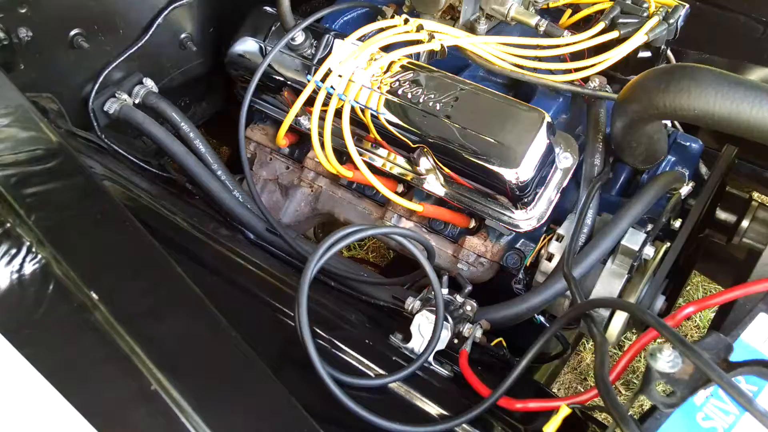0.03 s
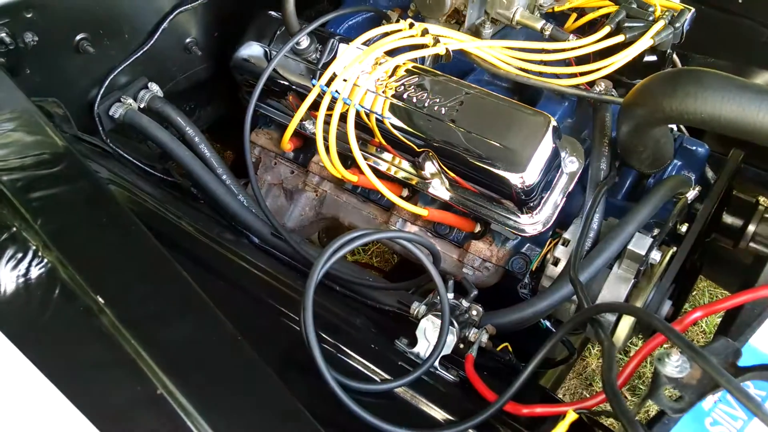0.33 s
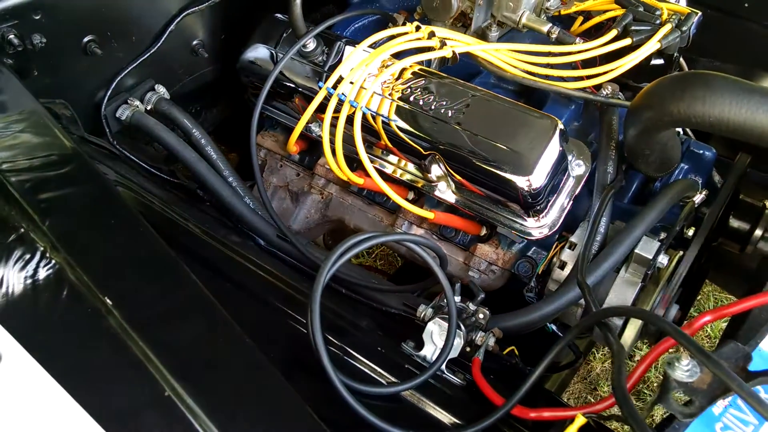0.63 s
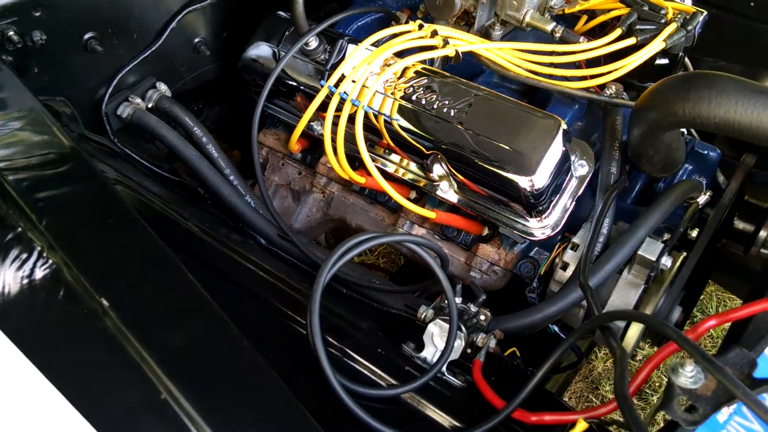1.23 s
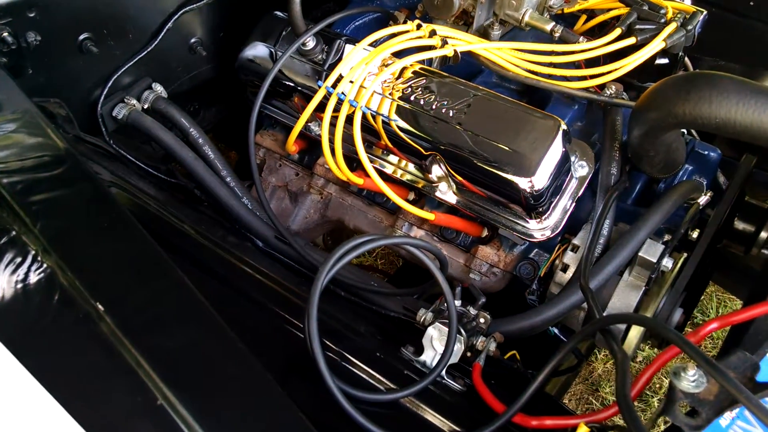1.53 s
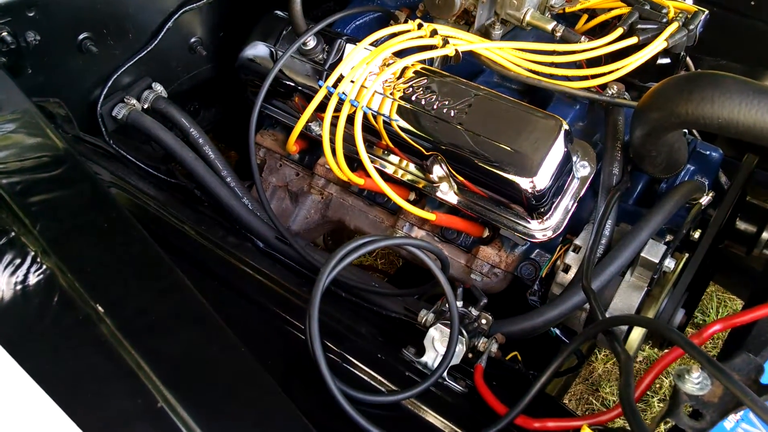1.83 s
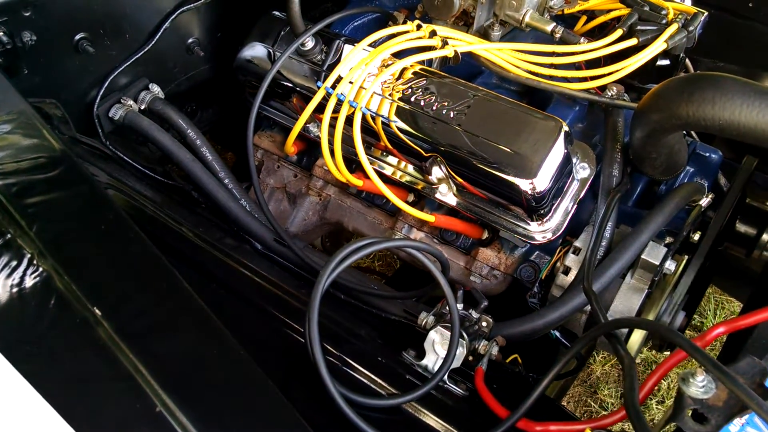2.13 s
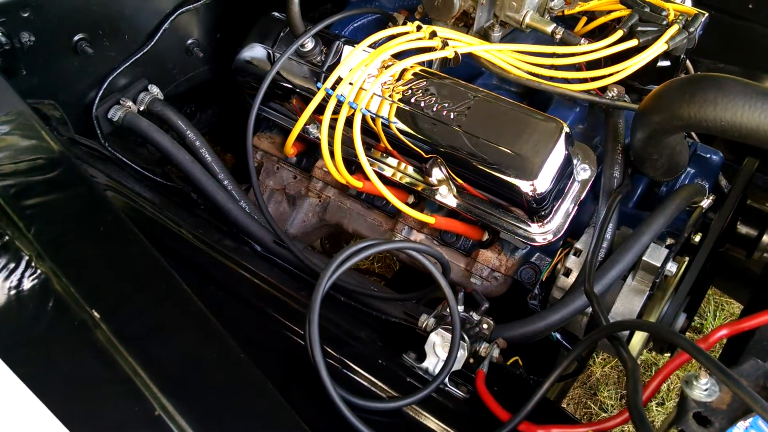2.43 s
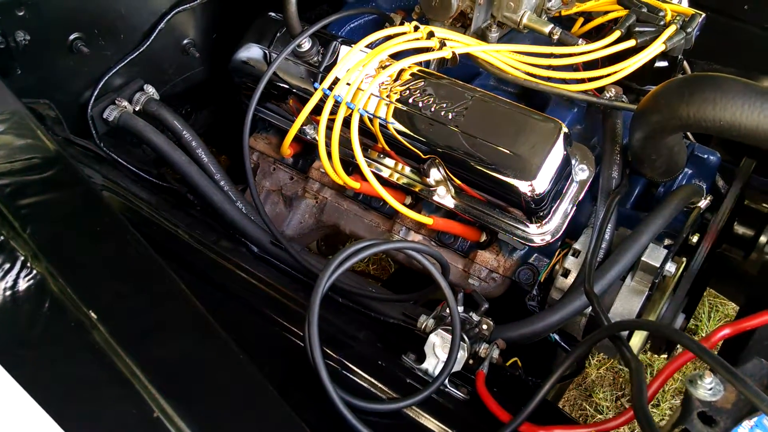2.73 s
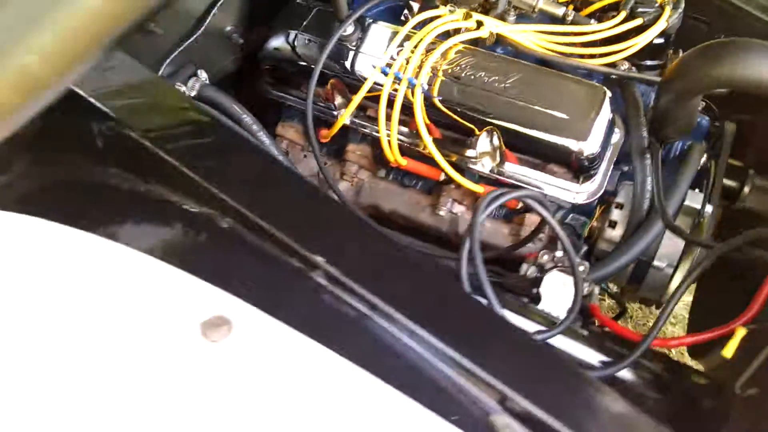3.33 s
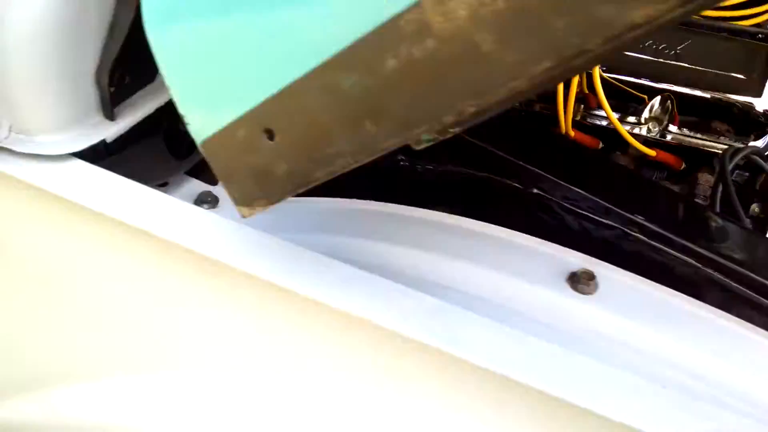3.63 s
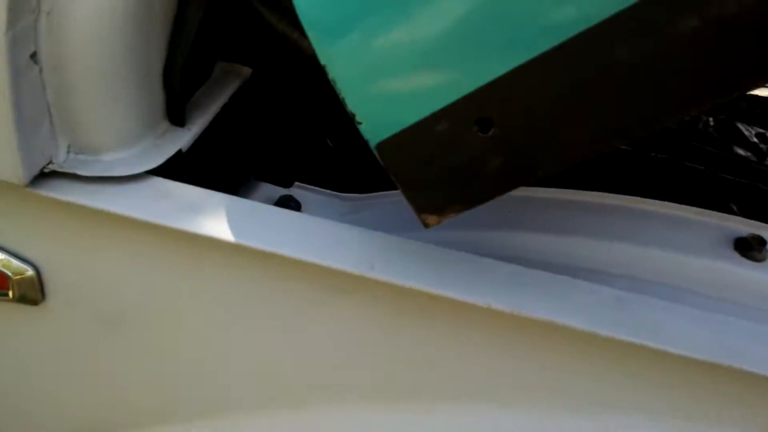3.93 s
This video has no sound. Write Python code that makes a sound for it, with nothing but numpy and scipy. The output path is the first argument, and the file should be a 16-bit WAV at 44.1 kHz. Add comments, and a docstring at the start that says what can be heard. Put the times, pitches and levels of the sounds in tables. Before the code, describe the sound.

A V8 engine cuts in at about 0.3 seconds, already idling, heard close above the open engine bay. Its low, slightly uneven chugging continues throughout, with a valve ticking about six times a second, light mechanical clatter and a few faint panel knocks. From about 3.4 seconds to the end at 4 seconds, the microphone backs away and the idle turns duller and boomier.

```python
"""Idling V8 engine

Eight uneven exhaust pulses per cycle excite the resonances of the pipes, and the harder ones make the
engine chug on its mounts. Block and valve gear clatter, a panel knocks now and then, and a loose valve
ticks once per cycle. A two-port microphone above the open bay backs away round the wing near the end,
so the sound turns duller, with more boom."""
import sys
import numpy as np
from scipy import signal
from scipy.fft import rfft, irfft, next_fast_len
from scipy.io import wavfile

SR = 44100
rng = np.random.default_rng(int(sys.argv[2]) if len(sys.argv) > 2 else 0)


def wav_out(sig):
    """Save sig, one row per channel (or a flat mono array), as 16-bit PCM at SR to the path in sys.argv[1]."""
    wavfile.write(sys.argv[1], SR, np.round(np.clip(np.atleast_2d(sig).T, -1, 1) * 32767).astype(np.int16))


N = 176400
SIZE = next_fast_len(N + SR // 2)  # padded for the decays
HZ = np.fft.rfftfreq(SIZE, 1 / SR)


# Exhaust pulse of each cylinder: phase/cycles, level/dB
CYLINDER_PULSES = [(.071, .8), (.211, 1.2), (.312, -.6), (.454, -1.5), (.576, 0), (.685, 2.4), (.839, -5.5),
                   (.936, -.9)]

def firings():
    """Quasi-periodic excitation: one slightly irregular impulse per cylinder and cycle, with one stumble."""
    jitter_s, spread_db = .00015, .45
    out = np.zeros(SIZE)
    for phase, db in CYLINDER_PULSES:
        late, strong = rng.standard_normal((len(CYCLES), 2)).T
        times = cycle_times(phase)
        stumble_db = -7 * np.exp(-((times - .882) / .012) ** 2)
        out += impulses(times + jitter_s * late, amp(db + stumble_db + spread_db * strong))
    return out


# Resonances of the exhaust pipes: f/Hz, bandwidth/Hz, level/dB
PIPE_MODES = [(45.75, 3.5, -1.45), (91.2, 7.7, 3), (107.2, 13.8, 0.7), (142.2, 8.1, -9.5),
              (187.2, 9.7, -15.5), (251.6, 7.7, -18.5)]

def exhaust(pulses):
    """Pipe resonance: the pulses drive modes of alternating sign, low-passed by the muffler."""
    f = HZ + 1e-6
    pipe = sum((-1) ** k * amp(db) / (1 + 1j * (f / hz - hz / f) * hz / width)
               for k, (hz, width, db) in enumerate(PIPE_MODES))
    muffler = 1 / (1 + (f / 600) ** 4)
    low_cut = (1j * f / (35 + 1j * f)) ** 2
    return coherent_pair(amp(33) * rfft(pulses) * pipe * muffler * low_cut)


# Noise of block, belts and valve gear: f/Hz, spectral level/dB
CLATTER_SPECTRUM = [(20, -75), (45, -90), (70, -49), (110, -64), (170, -54.5), (220, -76), (255, -61.5),
                    (290, -55), (330, -57.5), (390, -71), (435, -61), (475, -66), (560, -60), (630, -65.5),
                    (690, -60.5), (860, -61.5), (1030, -66.5), (1380, -62.5), (1640, -66), (1850, -63),
                    (2200, -64), (2500, -79), (3400, -70), (5200, -69.5), (8600, -69.5), (9700, -69.5),
                    (10600, -68), (13500, -69), (15500, -77.5)]
# Resonances of covers and brackets: f/Hz, bandwidth/Hz, level above the clatter/dB
COVER_MODES = [(514, 5.2, 10), (562, 10, 3.5), (583, 45, 5.5), (910, 33, 2), (1233, 73, 2.5), (1391, 16, 5),
               (1722, 24, 7.5), (1865, 41, 6), (2968, 47, 11), (3350, 27, 1), (3790, 100, 3),
               (4430, 36, 6.5), (6180, 36, 6.5), (9830, 160, 9), (11600, 330, -4)]

def block_clatter(pulses):
    """Forced vibration: noise surging with the firings, thuds and random rattles drive the covers."""
    rattles_per_s = 300
    surge = unit_rms(1 + .15 * convolve(pulses, decay(.0012)))
    hits = (rng.random(SIZE) < rattles_per_s / SR) * amp(3 * np.minimum(rng.exponential(1, SIZE), 3))
    rattle = amp(-5) * unit_rms(convolve(hits, decay(.003)))
    pair = []
    for _ in range(2):
        thud = unit_rms(convolve(pulses, decay(.017) * rng.standard_normal(SR // 8)))
        running = np.hypot(surge, rattle) * rng.standard_normal(SIZE)
        pair.append(unit_rms(running + amp(-12) * thud))
    covers_db = sum(db / (1 + (2 * (HZ - hz) / width) ** 2) for hz, width, db in COVER_MODES)
    return partly_coherent_pair(np.array(pair), curve(CLATTER_SPECTRUM) + covers_db)


# Engine cycles, timed by the tick of the loose valve: t/s, tick level/dB, chug level/dB
CYCLES = [(0.2616, -8, -8), (0.4305, -3.5, -8), (0.6001, -2.5, 4), (0.7655, -4.5, -1.5),
          (0.9344, -4.5, -2.5), (1.104, -4, 5), (1.275, -5, -8.5), (1.4483, -3.5, -6), (1.62, -6.5, -4),
          (1.7927, -6, -2.5), (1.9671, -4, 4), (2.1418, -7, 2.5), (2.3215, -5.5, 0), (2.495, -4.5, 1),
          (2.6698, -6.5, -4), (2.8443, -3.5, 0), (3.018, -8, 1.5), (3.194, -7, 2), (3.365, -4, 3),
          (3.538, -4.5, 1.5), (3.7114, -5.5, -2), (3.8833, -2.5, -4), (4.057, -2, -1)]
# Valve gear contacts: phase/cycles, decay/s, clack level/dB, snap level/dB, knock level/dB
VALVE_CONTACTS = [(-.06, .004, -10, -4, -11), (-.022, .004, -8, -13, -9), (.004, .002, 2, 0, -9),
                  (.014, .006, -5, -9, -11), (.031, .0018, -7, -16, 1), (.06, .007, -12, -18, -11),
                  (.15, .004, -15, -12, -8), (.372, .006, -16, -3, -16), (.53, .004, -20, -12, -14),
                  (.65, .005, -19, -10, -20)]
# Cover clack, bright snap and low knock of a contact: f/Hz, spectral level/dB
CLACK_SPECTRUM = [(300, -85), (2000, -70), (2800, -65), (3170, -44.5), (3420, -46.5), (3600, -52.5),
                  (3750, -51), (4100, -57.5), (4600, -56), (6000, -66), (15000, -85)]
SNAP_SPECTRUM = [(2000, -62.5), (6000, -72), (8500, -60), (9350, -51.5), (10300, -53), (11000, -57),
                 (11650, -55), (12400, -60), (15500, -67)]
KNOCK_SPECTRUM = [(200, -86), (900, -63), (1400, -48), (1650, -52), (1900, -46.5), (2200, -53), (2600, -68),
                  (8000, -82)]
CONTACT_RISE_S = .0004

def valve_gear():
    """Impact noise: each contact radiates a short burst, and incoherent bursts add in power."""
    tick_db, out = np.array(CYCLES)[:, 1], 0
    for k, colour in enumerate([CLACK_SPECTRUM, SNAP_SPECTRUM, KNOCK_SPECTRUM]):
        power = np.zeros(SIZE)
        for phase, decay_s, *dbs in VALVE_CONTACTS:
            sizes = amp(tick_db + dbs[k] + .4 * rng.standard_normal(len(tick_db)))
            shape = decay(decay_s) * (1 - decay(CONTACT_RISE_S))
            power += convolve(impulses(cycle_times(phase), sizes ** 2), (shape / shape.max()) ** 2)
        bursts = np.sqrt(abs(power)) * rng.standard_normal((2, SIZE))
        out += partly_coherent_pair(bursts, curve(colour))
    return out


# Blows of the harder firings: phase/cycles, boom level/dB, chug level/dB
HARD_FIRINGS = [(0.032, -41.5, -29.5), (.17, -52, -26), (.32, -28.5, -26.5), (0.702, -28.5, -40)]
# Modes of the boom and of the chug: f/Hz, decay/s, level/dB
BOOM_MODES = [(160.2, 0.019, -0.5), (178.7, 0.042, -9)]
CHUG_MODES = [(264, .016, -6.5), (297, 0.013, -1.5), (328.2, 0.019, -5)]

def chugging():
    """Shock excitation: the harder firings shake the engine on its mounts."""
    effort_db, out = np.array(CYCLES)[:, 2], 0
    for phase, boom_db, chug_db in HARD_FIRINGS:
        times = cycle_times(phase)
        out += struck(times, np.full(len(times), boom_db), BOOM_MODES)
        out += struck(times, effort_db + chug_db, CHUG_MODES)
    return out


# Knocks of a sheet-metal panel: t/s, level/dB
PANEL_HITS = [(.797, -21), (.985, -22.5), (1.14, -20.5), (2.045, -19), (2.416, -21), (3.212, -24)]
# Bending modes of the panel: f/Hz, decay/s, level/dB
PANEL_MODES = [(525, 0.012, -9), (555, 0.032, -8), (571, 0.017, -17)]

def panel_knocks():
    """Free vibration of a plate: the panel rings briefly after each knock."""
    times, dbs = np.transpose(PANEL_HITS)
    return struck(times, dbs, PANEL_MODES)


# Stray knocks, then stray snaps: rate/(1/s), level/dB, spread/dB, decay/s
LINKAGE_CONTACTS = [(45, -15.5, 3.5, .004), (70, -13, 4.5, .0014)]

def linkage_rattle():
    """Backlash: play in the linkages makes small impacts at random, a Poisson process."""
    out = 0
    for (per_s, db, spread_db, decay_s), colour in zip(LINKAGE_CONTACTS, [KNOCK_SPECTRUM, SNAP_SPECTRUM]):
        hits = rng.random(SIZE) < per_s / SR
        sizes = amp(db + spread_db * np.minimum(rng.exponential(1, SIZE), 2))
        envelope = convolve(hits * sizes, decay(decay_s) * (1 - decay(CONTACT_RISE_S)))
        out += partly_coherent_pair(envelope * rng.standard_normal((2, SIZE)), curve(colour))
    return out


# Engine tones: multiple of the cycle rate, level/dB, left minus right/dB
DRONE_HARMONICS = [(29, -43.5, 13), (43, -45, 8), (56, -57, 28)]

def drone():
    """Harmonics of a periodic motion: pure tones locked in phase to the engine cycle."""
    starts = cycle_times(0)
    cycles = np.interp(np.arange(SIZE) / SR, starts, np.arange(len(starts)))
    tones = 0
    for multiple, db, side_db in DRONE_HARMONICS:
        peaks = np.sqrt(2) * amp(db + np.array([[side_db], [-side_db]]) / 2)
        tones += peaks * np.sin(2 * np.pi * (multiple * cycles + rng.random()))
    return rfft(tones)


# Low air noise: f/Hz, spectral level/dB
AIR_SPECTRUM = [(10, -68), (22, -59), (33, -63), (62, -62), (110, -60), (220, -66), (500, -100)]

def air_rumble():
    """Incoherent noise: the air rumbles independently at each port."""
    return rfft(rng.standard_normal((2, SIZE))) * amp(curve(AIR_SPECTRUM)) * np.sqrt(SR / 2)


def struck(times, dbs, modes):
    """Modal superposition: each blow starts damped sines, slightly scattered in pitch and level."""
    pitch_scatter, spread_db, rise_s = .025, 1.5, .002
    t, out = np.arange(SR // 8) / SR, np.zeros(SIZE + SR)
    hz, decay_s, db = np.array(modes).T[:, :, None]
    for start, level in zip(times, dbs):
        detune, strong = rng.standard_normal((2, len(modes), 1))
        envelopes = amp(level + db + spread_db * strong) * decay(decay_s) * (1 - decay(rise_s))
        tones = envelopes * np.sin(2 * np.pi * hz * (1 + pitch_scatter * detune) * t)
        out[round(start * SR):][:len(t)] += tones.sum(0)
    return coherent_pair(rfft(out[:SIZE]))


# Level difference between the ports: f/Hz, left minus right/dB
PORT_BALANCE = [(60, -.3), (105, -1), (160, 7), (215, 3), (290, -0.5), (450, -1), (740, -4), (1220, 0.5),
                (2010, -3), (2600, 2.5), (3300, -0.5), (5300, -3), (7000, -4.5), (8600, -12), (9700, -12.5),
                (13500, -12.5), (15300, -14)]
# Phase difference between the ports: f/Hz, lead of the left/rad
PORT_LEAD = [(46, .5), (140, .65), (175, 0), (1500, -.1), (2100, -1.5), (2500, -3.1), (2950, -3.2),
             (3500, -6.2), (4300, -6.4), (4700, -9.1), (5300, -9.6), (6500, -12.6), (7800, -15.7),
             (9400, -18.9), (10900, -22), (12300, -25.1), (15300, -31.4)]

def coherent_pair(spectrum):
    """One wave reaches both ports, differing in level and phase; gives left and right spectra."""
    half = amp(curve(PORT_BALANCE) / 2) * np.exp(.5j * curve(PORT_LEAD))
    return np.array([spectrum * half, spectrum / half])


# Likeness of the two ports: f/Hz, coherence (0 to 1)
PORT_COHERENCE = [(60, .85), (200, .9), (700, .92), (1300, .97), (2200, .6), (2550, .99), (2900, .995),
                  (3200, .25), (3900, .9), (4700, .3), (5200, .85), (5800, .5), (9800, .65), (15000, .5)]

def partly_coherent_pair(noises, colour_db):
    """Partial coherence: two independent noises are coloured and mixed into left and right spectra."""
    right, other = rfft(noises) * amp(colour_db) * np.sqrt(SR / 2)
    coherence = curve(PORT_COHERENCE)
    left = coherence * right + np.sqrt(1 - coherence ** 2) * other
    return np.array([left * amp(curve(PORT_BALANCE)) * np.exp(1j * curve(PORT_LEAD)), right])


def cycle_times(phase):
    """The time at which each engine cycle reaches this phase."""
    starts = np.array(CYCLES)[:, 0]
    periods = np.append(np.diff(starts), starts[-1] - starts[-2])
    return starts + phase * periods


def amp(db):
    """Decibels to amplitude ratio."""
    return 10 ** (np.asarray(db) / 20)


def unit_rms(x):
    """Normalisation to unit power."""
    return x / np.sqrt(np.mean(x ** 2) + 1e-20)


def curve(points):
    """Interpolation along log frequency."""
    hz, value = np.transpose(points)
    return np.interp(np.log(HZ + 1), np.log(hz), value)


def impulses(times, sizes):
    """A train of single-sample impulses."""
    out = np.zeros(SIZE)
    np.add.at(out, np.clip(np.round(times * SR).astype(int), 0, SIZE - 1), sizes)
    return out


def decay(decay_s):
    """Exponential damping with this time constant."""
    return np.exp(-np.arange(SR // 8) / SR / decay_s)


def convolve(x, response):
    """Linear response to x, cut to length."""
    return signal.fftconvolve(x, response)[:SIZE]


# Band levels along the microphone's path: t/s, bass/dB, low middle/dB, middle/dB, treble/dB
PATH_LEVELS = [(.3, .5, -1, -0.5, -1), (1.1, 1.4, 0.5, 0.5, 0.5), (2.1, 0.5, -0.5, 1.5, 1),
               (2.898, 0.5, -0.5, 0, 0), (3.3, 0, -2, -0.5, -1), (3.42, 1.5, 0, -1.5, -2),
               (3.58, .5, 2.5, -2, -2.5), (3.75, 1, 4.5, -4.5, -5.5), (4, 0, 5, -7, -9.5)]
# Flat part of each band, crossfaded in between: lower f/Hz, upper f/Hz
PATH_BANDS = [(90, 130), (170, 340), (480, 2200), (3500, 15000)]

def scene():
    """Superposition: the sources' spectra add, and each band's level follows the microphone's position."""
    pulses = firings()
    engine = exhaust(pulses) + drone() + air_rumble() + block_clatter(pulses)
    engine += panel_knocks() + chugging() + valve_gear() + linkage_rattle()
    t, path, out = np.arange(N) / SR, np.array(PATH_LEVELS), 0
    for k, share in enumerate(np.eye(len(PATH_BANDS))):
        band = np.interp(HZ, np.ravel(PATH_BANDS), np.repeat(share, 2))
        gain = amp(np.interp(t, path[:, 0], path[:, k + 1]))
        out += irfft(engine * band, SIZE)[:, :N] * gain
    return out


def record(dry):
    """Gating and band limiting: the sound cuts in abruptly and passes a steep low-pass filter."""
    start_s, cutoff_hz = .307, 15650
    gate = np.clip((np.arange(N) / SR - start_s) / .001, 0, 1)
    low_pass = signal.firwin(511, cutoff_hz, window=("kaiser", 9), fs=SR)
    return signal.oaconvolve(dry * gate, low_pass[None], "same")


dry = scene()
out = record(dry)
wav_out(out)
```